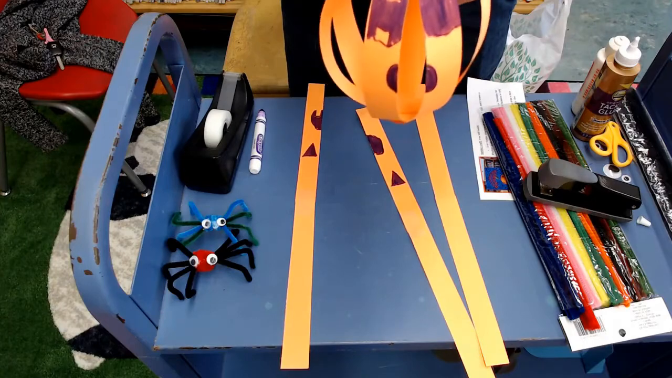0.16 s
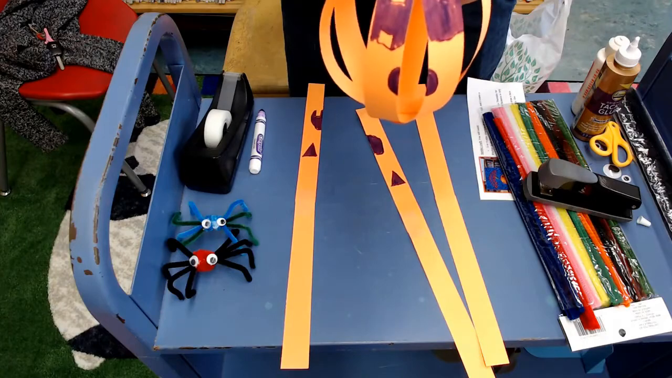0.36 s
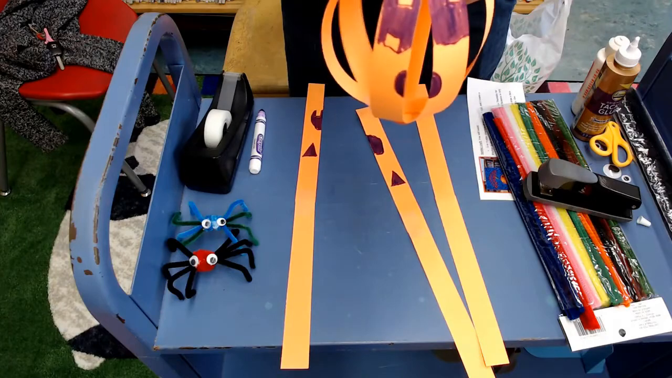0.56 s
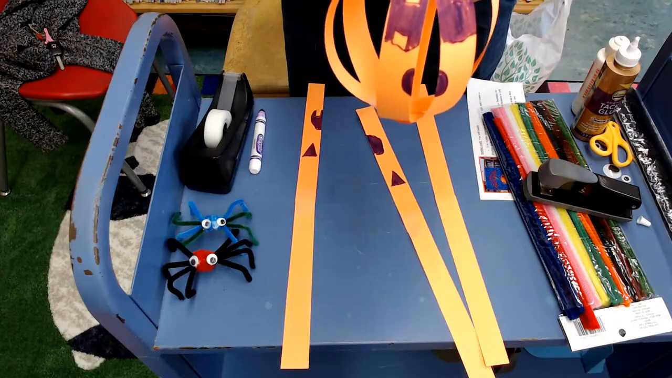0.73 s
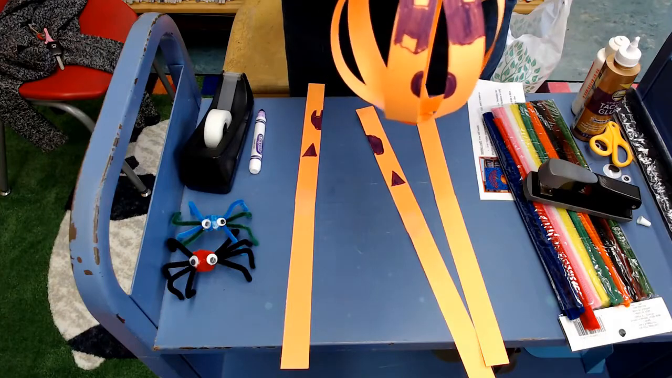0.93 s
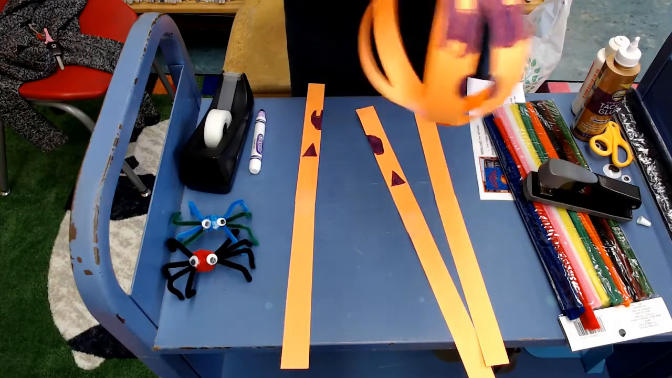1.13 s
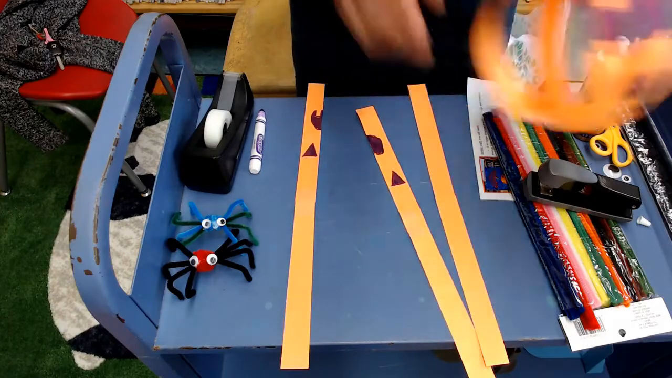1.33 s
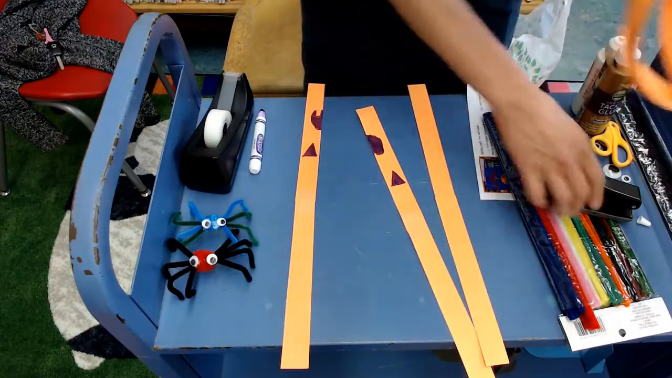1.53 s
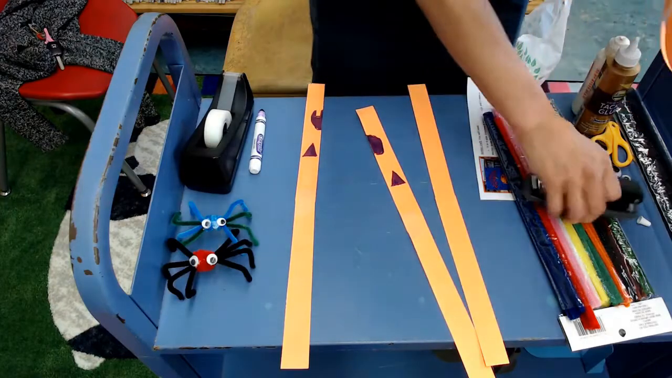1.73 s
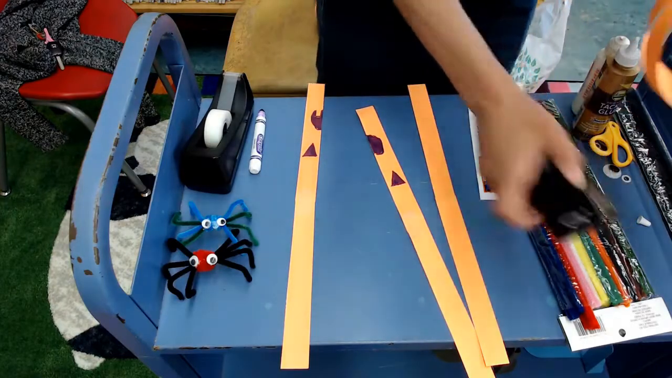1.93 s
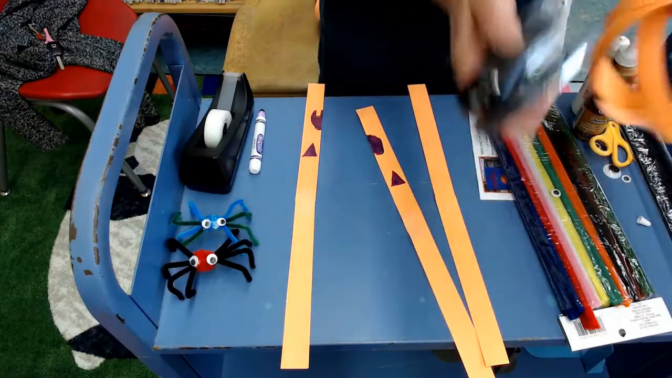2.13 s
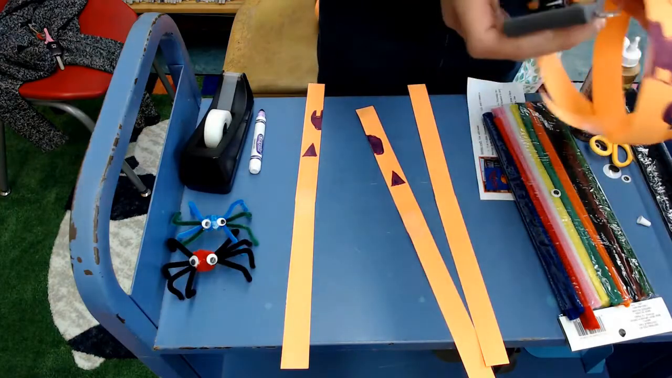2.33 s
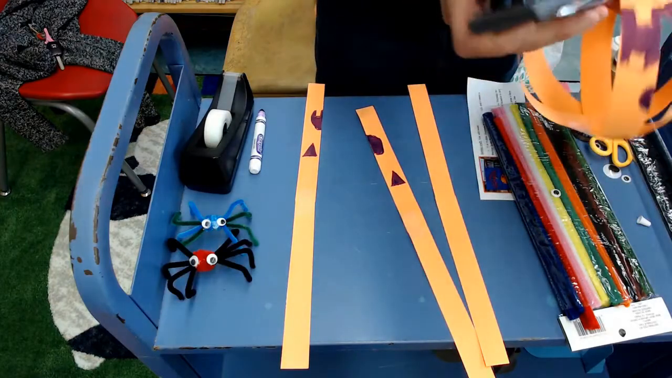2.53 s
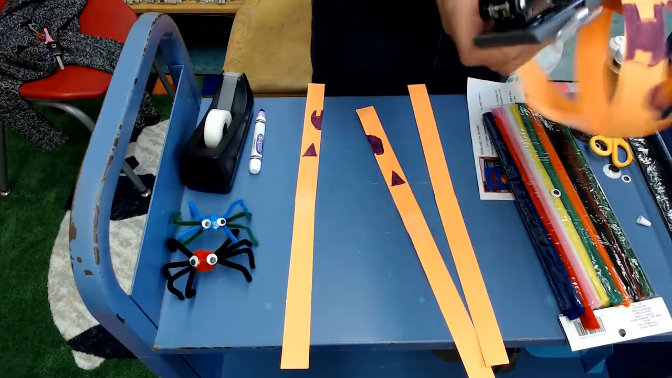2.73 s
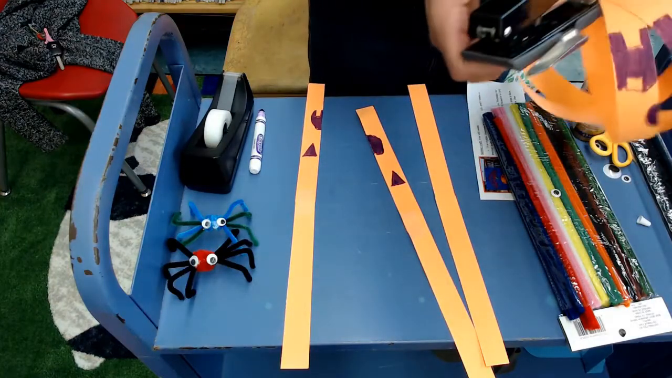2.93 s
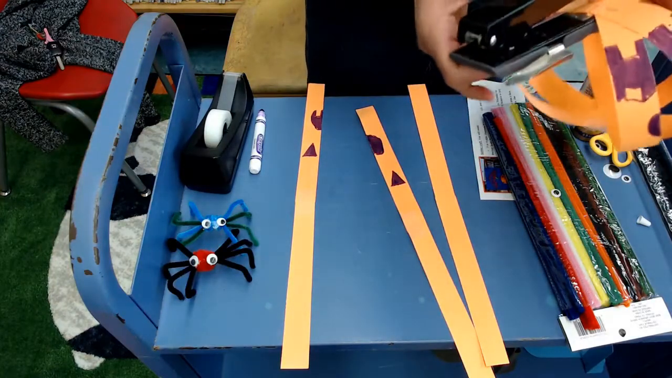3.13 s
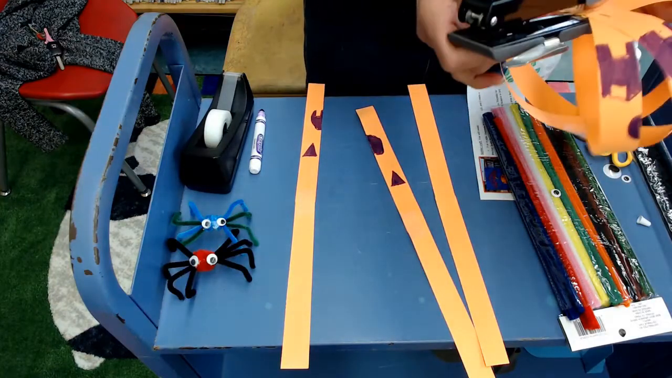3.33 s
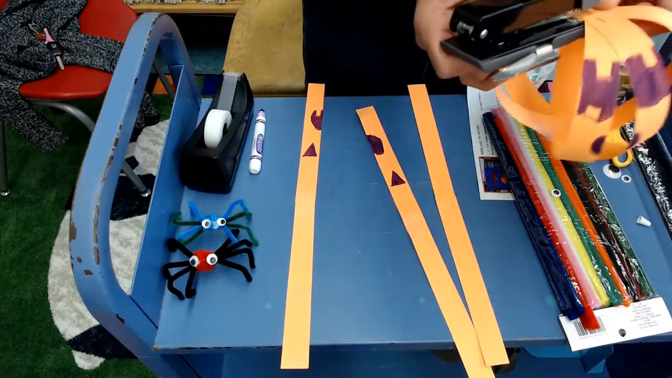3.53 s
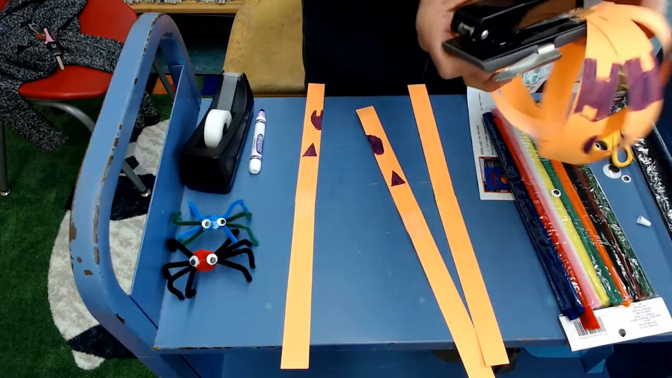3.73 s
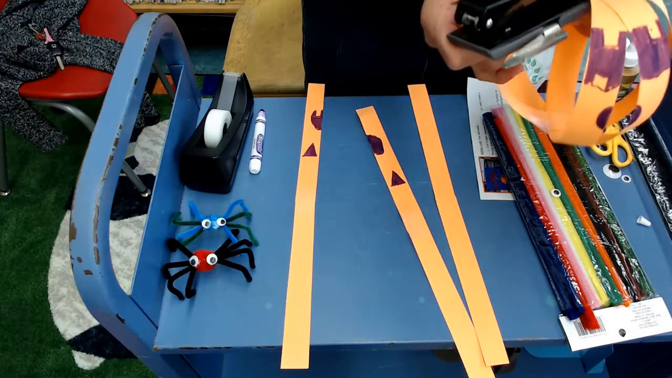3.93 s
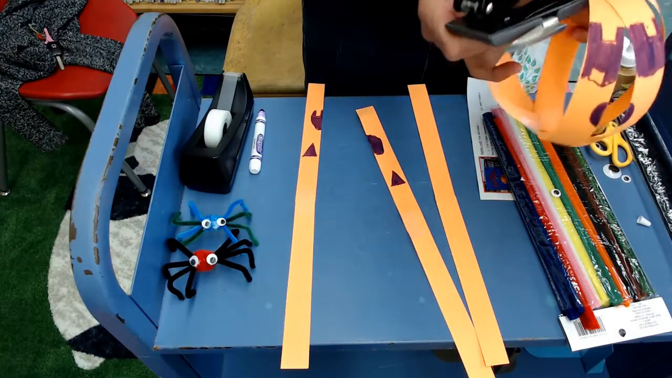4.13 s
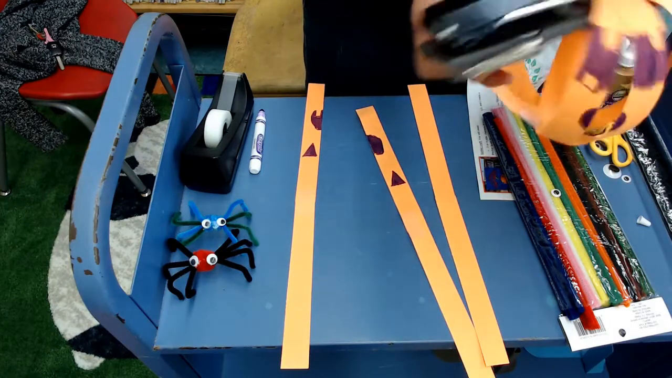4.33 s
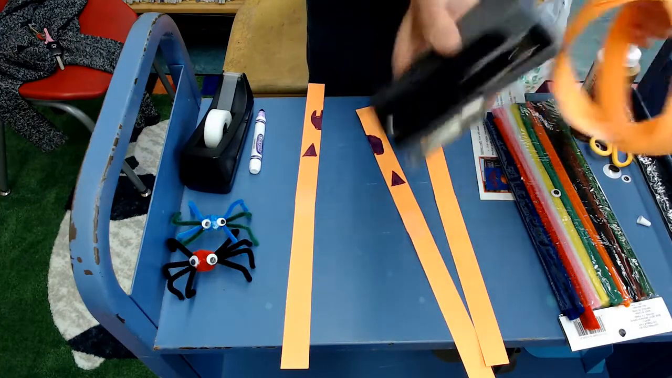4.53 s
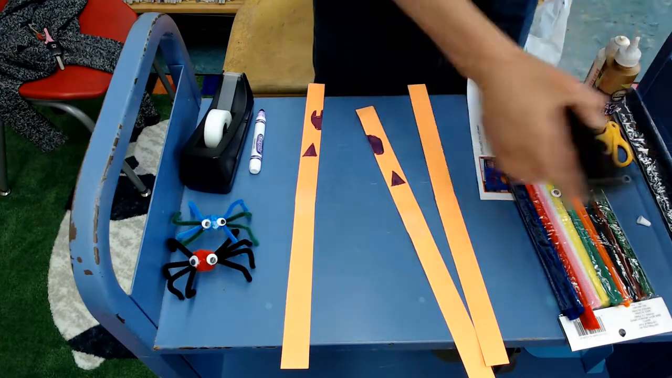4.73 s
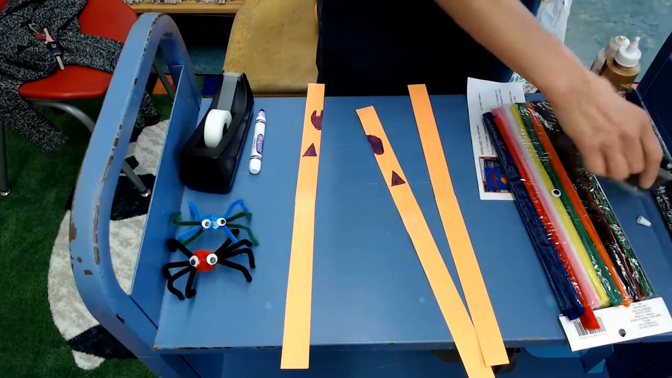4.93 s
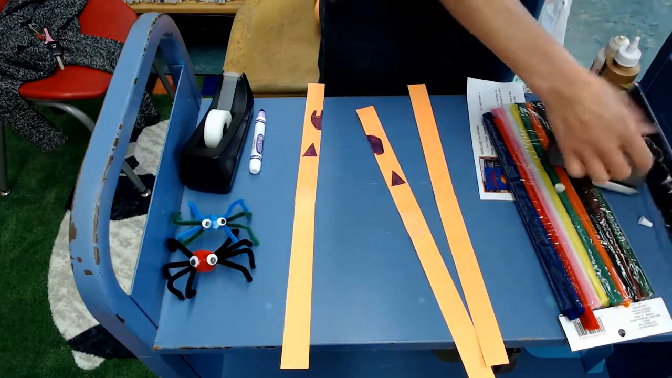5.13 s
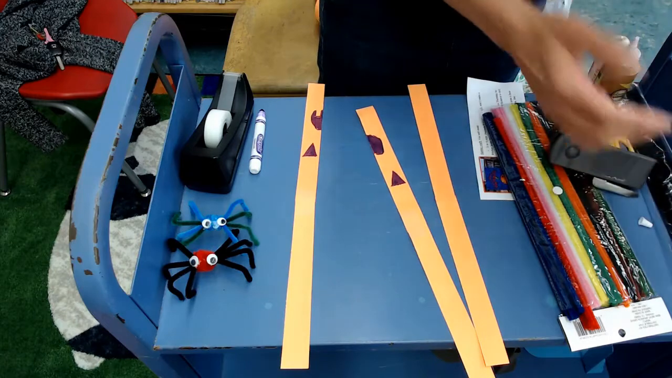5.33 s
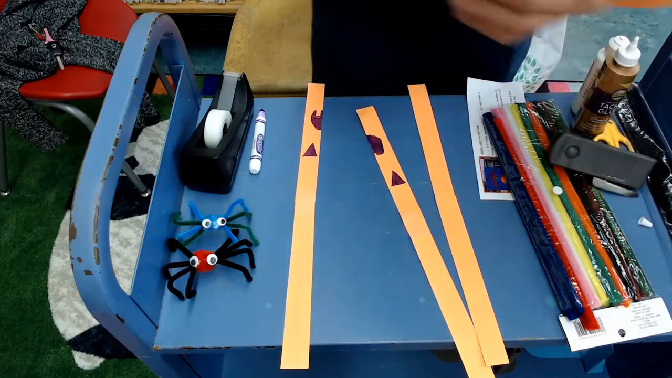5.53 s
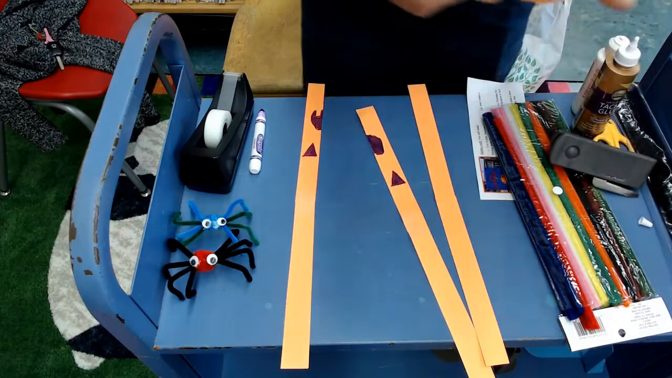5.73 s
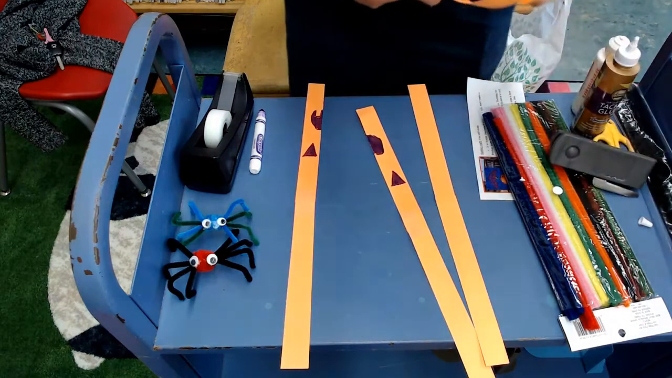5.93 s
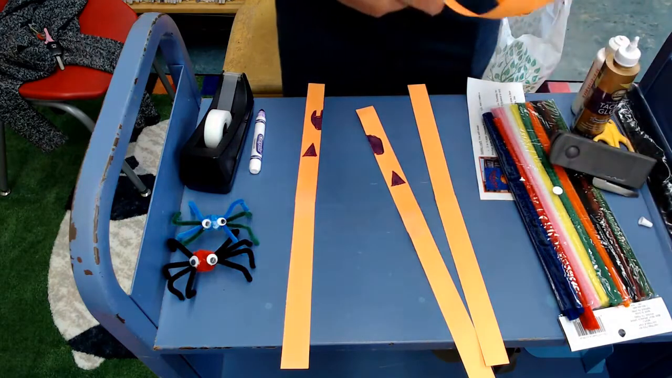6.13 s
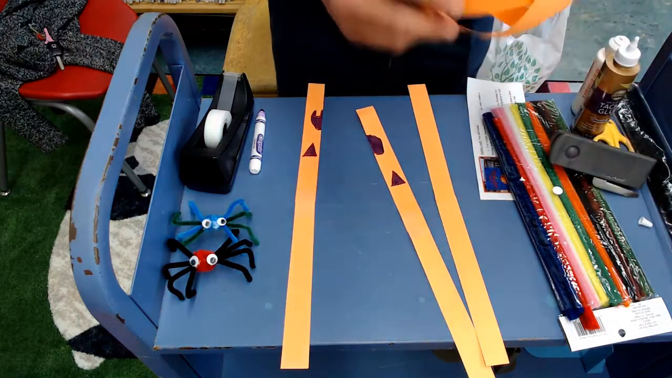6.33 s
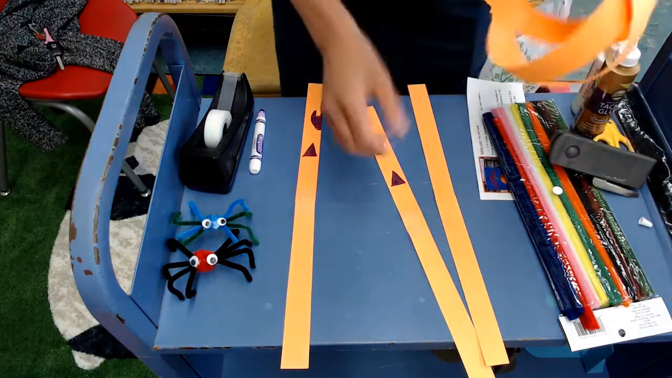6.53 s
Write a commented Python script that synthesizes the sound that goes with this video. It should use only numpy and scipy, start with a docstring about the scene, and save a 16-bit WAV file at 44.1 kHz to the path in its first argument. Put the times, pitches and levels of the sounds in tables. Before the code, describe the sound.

Faint paper crackles, two loud stapler clacks with a jangling spring, a sharp landing on a packet over sheet metal, then light rustling.

```python
"""Stapler and paper over a metal cart

Close up in a quiet room, paper slides in the hands: moving bands of noise, with short pops and crackles on top.
A desk stapler is picked up, snaps twice and springs open: noise bursts through arm resonances, a jangling tail.
It lands on a plastic packet on a sheet-metal cart: cracks, ringing modes, a dull thud, crunching and rattling.
Ventilation hums underneath: filtered noise and a wavering fan tone."""
import sys
import numpy as np
from scipy import signal
from scipy.fft import rfft, irfft, next_fast_len
from scipy.io import wavfile
from scipy.ndimage import uniform_filter1d, map_coordinates

SR = 44100
rng = np.random.default_rng(int(sys.argv[2]) if len(sys.argv) > 2 else 0)


def master_out(mix):
    """Clip the mix to full scale and print it as 16-bit PCM to the path in sys.argv[1]."""
    frames = np.transpose(np.atleast_2d(mix))
    ceiling = np.clip(frames, -1, 1)
    pcm = np.round(ceiling * 32767).astype(np.int16)
    wavfile.write(sys.argv[1], SR, pcm)


N = 294147  # length [samples]

# slow random drift of the low rumble and hum: (time [s], rumble level [dB], hum level [dB])
RUMBLE_HUM_DRIFT = [(0.0, -72.5, -71.5), (1.22, -69.5, -71.5), (4.07, -75.5, -71.5), (4.55, -67.5, -72),
                    (4.85, -73, -70), (5.0, -64, -73), (5.37, -66, -69), (5.93, -74, -68.5),
                    (6.35, -63, -70), (6.67, -66.5, -66.5)]
# colour of the low rumble: (frequency [Hz], relative level [dB])
RUMBLE_COLOUR = [(10, -29), (20, -7), (35, -0.5), (55, 1.5), (72, -6.5), (100, -15.5), (130, -30),
                 (200, -81)]
# duct resonances: (frequency [Hz], width [Hz], level [dB])
DUCT_MODES = [(82, 7.4, -2), (157.6, 12, -7), (203.5, 6.5, -7), (228, 24, -17), (430.4, 87, -24)]
# colour of the room tone: (frequency [Hz], relative level [dB])
ROOM_TONE_COLOUR = [(150, -23.5), (250, -2), (1180, -13), (6700, -24.5), (14700, -27), (16000, -26)]
# decay of the room's answer: (frequency [Hz], 60 dB decay [s])
ROOM_DECAY = [(300, 1), (2000, 0.16), (6000, 0.45), (14000, .3)]
FAN_HZ, ROOM_TONE_DB = 90.8, -81.5

# blows on the cart: (time [s], crack level [dB], crack 60 dB decay [s], boom level [dB], crack's ringing band [Hz])
LANDING_BLOWS = [(4.8366, -17.5, 0.031, -37, 7170), (4.862, -33.5, 0.019, -49.5, 4800),
                 (4.874, -37, .03, -59.5, 2300), (4.91, -38, 0.17, -49.5, 2050),
                 (4.9389, -25, 0.021, -53, 6150), (4.9464, -25, 0.029, -52.5, 6260),
                 (4.9626, -31.5, 0.085, -53, 2780), (4.9777, -32.5, 0.027, -68, 2730),
                 (5.002, -38.5, 0.03, -75, 5860), (5.0167, -39.5, 0.074, -61.5, 5160),
                 (5.048, -42.5, 0.047, -59.5, 5900), (5.056, -39.5, 0.037, -60.5, 2050),
                 (6.4847, -57, 0.053, -56, 2270), (6.544, -72, .04, -60.5, 1700)]
# modes of the sheet metal: (frequency [Hz], level [dB], 60 dB decay [s])
CART_MODES = [(121.3, -4.5, 0.64), (209.4, 2, 0.21), (250, -6, 1.6), (267.2, 7, 0.18), (363.4, -6, 0.23),
              (446, -4, 0.15), (618, -5.5, 0.53), (717, -3, 0.15), (894, -17.5, 0.44), (1065, -8, 0.23)]
# settling on the packet: (time [s], crunch level [dB], cart rattle level [dB])
SETTLING_LEVELS = [(4.84, -45, -44.5), (5.074, -56, -56.5), (5.2, -103, -77)]
# colour of a landing crack: (frequency [Hz], relative level [dB])
CRACK_COLOUR = [(470, -8), (800, -9), (2570, 4), (3650, -11), (4030, 6), (7360, -1), (16000, -15)]
# colour of the crunching packet: (frequency [Hz], relative level [dB])
PACKET_COLOUR = [(880, -6), (1500, -5), (2540, -8), (2830, -11), (4000, -24), (5170, -17.5), (16000, -37)]
# colour of the cart rattle: (frequency [Hz], relative level [dB])
RATTLE_COLOUR = [(59, -35), (100, -13.5), (323, -9.5), (609, -0.5), (744, -6), (4000, -16.5), (5200, -49.5),
                 (8800, -120)]
THUD_DB, THUD_HZ = 8.5, 169  # dull push, level against the boom

# strokes of paper through the fingers:
# (loudest time [s], rise [s], fall [s], level [dB], brightest band [Hz], body against the hiss [dB])
PAPER_STROKES = [(.01, 0.019, 0.03, -75.5, 4830, -3), (.13, 0.019, 0.071, -73.5, 4900, -2),
                 (.35, 0.0054, 0.03, -71, 4530, -7), (.636, 0.0054, 0.014, -65.5, 4860, 2),
                 (.81, 0.0099, 0.024, -73, 5100, 2.5), (.965, 0.076, 0.043, -71.5, 6240, -6),
                 (1.45, .02, .07, -86, 3600, 12), (1.62, 0.16, 0.4, -71.5, 3600, 7.5),
                 (1.885, 0.046, 0.017, -66.5, 4550, -2.5), (2.03, 0.024, 0.047, -75, 4700, 3.5),
                 (2.13, 0.061, 0.057, -69, 4560, 1), (2.37, 0.056, 0.05, -72.5, 6270, -1.5),
                 (2.488, 0.022, 0.043, -69, 3620, 5.5), (2.703, 0.14, 0.1, -63.5, 7600, -4.5),
                 (3.1, 0.074, 0.091, -77.5, 4770, 12), (3.23, 0.12, .08, -71.5, 4800, -0.5),
                 (3.33, 0.062, 0.05, -65, 7360, -6), (3.5, 0.18, 0.15, -65.5, 6560, -1.5),
                 (4.068, 0.098, 0.069, -56.5, 5850, 2.5), (4.169, 0.012, 0.054, -55.5, 5270, -8),
                 (4.26, 0.033, .04, -71, 4860, 2), (4.34, 0.041, 0.057, -64.5, 5430, -5.5),
                 (4.465, 0.047, 0.024, -60.5, 5130, -4.5), (4.58, 0.038, 0.034, -68.5, 5070, -4),
                 (4.711, 0.079, 0.083, -66.5, 5065, -3), (5.305, 0.017, 0.039, -61, 5190, -1.5),
                 (5.439, 0.078, 0.076, -63.5, 5243, -2.5), (5.691, 0.094, 0.12, -68, 6010, -12),
                 (5.9, 0.033, 0.025, -62.5, 5710, 2), (6.029, 0.086, 0.078, -63, 6290, -5.5),
                 (6.16, 0.081, 0.071, -64, 6010, 0.5), (6.351, 0.048, 0.055, -71, 5300, -3),
                 (6.44, 0.046, 0.032, -70, 5350, -5.5), (6.525, 0.025, 0.083, -64.5, 4370, 1),
                 (6.67, 0.063, 0.045, -63, 4500, -2)]
# short pops and crackles: paper, packet, stapler being picked up, onsets of swishes:
# (time [s], level [dB], centre [Hz], body against that level [dB])
PAPER_POPS = [(0.569, -65, 7450, -25), (0.778, -61.5, 3650, -26), (0.803, -63.5, 6200, -5),
              (0.954, -45.5, 6150, -16.5), (0.978, -56, 4650, -11), (1.25, -60, 4000, -30),
              (1.407, -60.5, 2560, 9.5), (1.415, -52.5, 3500, 10.5), (1.422, -51, 3440, 3),
              (1.431, -53.5, 2550, 6), (1.511, -56.5, 1750, -10), (1.537, -54.5, 2500, 3.5),
              (1.553, -47.5, 5500, -2), (1.568, -53.5, 5050, -1), (1.588, -57, 3870, 1),
              (1.606, -50, 3100, -2), (1.619, -48.5, 4560, -14), (1.6235, -54.5, 5090, 4.5),
              (1.644, -59, 2480, -6), (1.654, -56, 2500, -3), (1.6633, -49.5, 2920, -14),
              (1.676, -59, 4000, -3), (1.723, -53.5, 2520, -12), (1.727, -51, 3820, -3.5),
              (1.761, -55, 2530, -18), (1.774, -63, 3930, -10), (2.211, -63.5, 4400, -5),
              (2.244, -59, 4030, -4.5), (2.32, -69, 2500, 11), (2.617, -55, 3100, -9),
              (2.825, -68.5, 2440, 12), (3.057, -46.5, 5050, -1.5), (3.112, -43.5, 2730, -11),
              (3.387, -65, 2020, 8.5), (4.154, -50.5, 4750, -8), (4.319, -56.5, 5400, -24),
              (5.303, -55.5, 6010, -9), (5.334, -47.5, 5357, -39), (5.42, -42.5, 4550, -5),
              (5.905, -57.5, 4682, 0.5)]
# colour of the paper hiss: (frequency [Hz], relative level [dB])
HISS_COLOUR = [(1180, -40), (2000, -9.5), (2830, -2), (7510, -2.5), (10000, -8), (12200, -7),
               (15100, -12.5), (16000, -20)]
# level change at a stroke's two ends, squareness of its arch, depth of its wavering
EDGE_DB, SHOULDER, FLUTTER_DB = -11, 2.5, 2
HELD_DB = -89  # the strips whisper between strokes
TICK_T60_S, TICK_DB = 0.003, 0.5  # sharp front of a pop
# decay of a -53.5 dB pop, and how many dB longer it gets per dB of level
POP_T60_S, POP_T60_GROWS_DB = 0.02, 0.45

# stapler contacts: (time [s], level [dB], rise [s], 60 dB decay [s],
#                    best-driven band [Hz], width of that band [Hz], its lift [dB])
STAPLER_CONTACTS = [(3.6335, -10.5, 0.0011, 0.015, 4558, 1400, 15),
                    (3.647, -37.5, 0.0039, 0.14, 2300, 370, 7), (3.71, -8, 0.00099, 0.018, 1990, 1600, 6.5),
                    (3.722, -30.5, 0.0034, 0.068, 1880, 250, -1),
                    (3.73, -36, 0.0015, 0.019, 6530, 3000, -3),
                    (3.979, -43.5, 0.0025, 0.053, 4500, 5400, 12.5),
                    (3.991, -38, .003, 0.067, 3000, 1500, 7.5), (3.99, -45, .006, 0.029, 1330, 150, 16),
                    (3.999, -27, 0.0015, 0.024, 4570, 3000, 15.5), (4.003, -54, 0.0026, 0.01, 1530, 17, 37),
                    (4.0271, -41, 0.0016, 0.022, 3500, 2400, 8), (4.029, -41, .002, 0.013, 1664, 100, 23),
                    (4.029, -44.5, 0.0027, 0.044, 363, 82, 29)]
# stapler arm and magazine: (frequency [Hz], width [Hz], level [dB])
ARM_MODES = [(250, 580, -14), (656, 350, -6.5), (1140, 150, 3), (1570, 180, -3.5), (1720, 140, -3),
             (2320, 300, -4.5), (3200, 400, -4.5), (4520, 740, -3.5), (5300, 860, -4), (6670, 1100, -4),
             (8440, 730, -4), (10900, 770, -8.5), (14400, 2200, -12)]
# return spring: (frequency [Hz], width [Hz], level [dB], 60 dB decay [s])
SPRING_MODES = [(1600, 160, -4, .33), (1760, 170, -3, .4), (1920, 140, -1, .3), (2130, 170, -2, .24)]
# colour of the tail after a snap: (frequency [Hz], level [dB])
ECHO_COLOUR = [(400, -24), (1100, -15), (1450, -12.5), (1720, -5), (2050, -2.5), (2500, -12.5), (4300, -9),
               (7500, -17), (16000, -26)]
# tail drive: offset, dB of drive per dB of contact, and the band that drives it most
ECHO_DB, ECHO_GROWS, ECHO_HZ = 15, 1.4, 1900
SPRING_DB, JANGLE_DB = -46, 5.5  # level against the tail drive, unevenness of the rattle


def amp(db):
    """Decibels to a gain."""
    return 10 ** (np.asarray(db) / 20)


def unit(x):
    """Scale to rms 1."""
    return x / np.sqrt(np.mean(x ** 2) + 1e-20)


def along(points, hz):
    """Read (frequency, value) points on a log frequency axis."""
    f, v = np.transpose(points)
    return np.interp(np.log(hz + 1), np.log(f + 1), v)


def curves(rows):
    """One value per sample for each column after the time."""
    s, *cols = np.transpose(rows)
    return [np.interp(np.arange(N) / SR, s, c) for c in cols]


def wobble(rate):
    """A smooth random curve, rate knots a second."""
    knots = rng.standard_normal(int(N * rate / SR) + 4)
    return map_coordinates(knots, [np.arange(N) * rate / SR])


def filtered(x, response):
    """Shape x by a complex response of frequency."""
    m = next_fast_len(len(x) + 8192)
    spectrum = rfft(x, m) * response(np.fft.rfftfreq(m, 1 / SR))
    return irfft(spectrum, m)[:len(x)]


def peak(f, hz, width):
    """Response of one causal resonance."""
    return 1j * f * width / (hz * hz - f * f + 1j * f * width)


def body(modes):
    """Resonances side by side, with alternating polarity."""
    return lambda f: sum((-1) ** k * amp(db) * peak(f, hz, width)
                         for k, (hz, width, db) in enumerate(modes))


def grainy(spectrum, grain_db, rate):
    """Coloured noise of rms 1 whose level wanders, rate knots a second."""
    noise = rng.standard_normal(N) * amp(grain_db * wobble(rate))
    return unit(filtered(noise, lambda f: amp(along(spectrum, f))))


def burst(response, rise, t60):
    """A puff of noise around one firm push at its crest, through a response."""
    t = np.arange(SR // 4) / SR
    shape = amp(-60 * np.maximum(t - rise, 0) / t60) * np.minimum(t / rise, 1) ** 2
    push = 4.5 * signal.unit_impulse(len(t), round(rise * SR))
    x = filtered(rng.standard_normal(len(t)) * shape + push, response)
    # the loudest 64 samples get an rms of 0.5, so peaks come out near 1
    return 0.5 * x / np.sqrt(uniform_filter1d(x ** 2, size=64).max())


def add(out, s, x):
    """Mix x into out from time s."""
    start = round(s * SR)
    out[start:][:len(x)] += x[:N - start]


def air():
    """Drifting low rumble and duct resonances, both filtered noise, with a wavering fan tone and faint hiss."""
    rumble_db, hum_db = curves(RUMBLE_HUM_DRIFT)
    fan_gain = amp(-0.5 + 2.5 * wobble(9))
    fan = fan_gain * np.sin(2 * np.pi * FAN_HZ * np.arange(N) / SR + 1.1 * wobble(5.9))
    duct = unit(filtered(rng.standard_normal(N), lambda f: body(DUCT_MODES)(f) * peak(f, 100, 430)))
    rumble = amp(rumble_db) * grainy(RUMBLE_COLOUR, grain_db=-2.0, rate=6)
    hum = amp(hum_db) * (fan + amp(-1.0) * duct)
    return rumble + hum + amp(ROOM_TONE_DB) * grainy(ROOM_TONE_COLOUR, grain_db=1.97, rate=18)


def room(x):
    """The room answers with a diffuse noise tail in which each frequency dies at its own speed."""
    hz, t, z = signal.stft(rng.standard_normal(SR * 3 // 4), SR, nperseg=256)
    decay = amp(-60 * t / along(ROOM_DECAY, hz)[:, None])
    tail = signal.istft(z * decay, SR, nperseg=256)[1]
    delayed = np.pad(x, (300, 0))  # samples, about 7 ms
    return signal.fftconvolve(delayed, tail / np.linalg.norm(tail))[:N]


def ring(modes, blur):
    """Modes struck at new strengths swell and die; phase noise widens high and damped ones most."""
    t = np.arange(SR) / SR
    out = np.zeros(SR)
    for hz, db, t60 in modes:
        envelope = amp(db + rng.uniform(-4.8, 1.2) - 60 * t / t60)
        swell = 1 - np.exp(-t * hz)  # over about one cycle
        drift = blur * hz / t60 * np.cumsum(rng.standard_normal(SR))
        out += envelope * swell * np.sin(2 * np.pi * hz * t + drift)
    return out


def clatter(s0, s1, hz, cycles, count):
    """Loose parts tick together: short damped rings at scattered pitches and sizes, rms 1 over the span."""
    when, pitch, size = rng.random((count, 3)).T
    pitch = np.clip(hz * 2 ** (3.2 * (pitch - 0.5)), 100, 14000)[:, None]
    t = np.arange(SR // 25) / SR
    gain = amp(-5 * np.log(size + 0.06))[:, None]
    rings = gain * np.sin(2 * np.pi * pitch * t) * np.exp(-t * pitch / cycles)
    at = ((s0 + (s1 - s0) * when) * SR).astype(int)[:, None] + np.arange(len(t))
    x = np.bincount(at.ravel(), rings.ravel(), N)
    return x / np.sqrt(np.sum(x ** 2) / ((s1 - s0) * SR))


def cart():
    """Blows crack on the packet and ring the sheet metal; things crunch and clatter as the stapler settles."""
    out = np.zeros(N)
    for s, db, t60, boom_db, hz in LANDING_BLOWS:
        colour = lambda f: amp(along(CRACK_COLOUR, f)) * (0.37 + 1.76 * peak(f, hz, 150))
        add(out, s, amp(db) * burst(colour, 0.00017, t60))
        thud = amp(THUD_DB) * burst(lambda f: peak(f, THUD_HZ, THUD_HZ), 0.00086, 0.048)
        add(out, s, amp(boom_db) * ring(CART_MODES, blur=2e-5))
        add(out, s, amp(boom_db) * thud)
    crunch_db, rattle_db = curves(SETTLING_LEVELS)
    s0, s1 = SETTLING_LEVELS[0][0], SETTLING_LEVELS[-1][0]
    settling = np.interp(np.arange(N) / SR, [s0 - 0.003, s0, s1, s1 + 0.065], [0, 1, 1, 0])
    crunch = grainy(PACKET_COLOUR, grain_db=3, rate=130)
    crunch += amp(-4.5) * clatter(s0, s1, hz=3590, cycles=9, count=160)
    rattle = grainy(RATTLE_COLOUR, grain_db=1.0, rate=120)
    rattle += amp(-3.0) * clatter(s0, s1, hz=1082, cycles=3.4, count=70)
    return out + settling * (amp(crunch_db) * crunch + amp(rattle_db) * rattle)


def strokes():
    """Gain of the sliding: each stroke is an arch that rises and falls at its own pace."""
    t, power = np.arange(N) / SR, amp(HELD_DB) ** 2
    for s, rise, fall, db, *_ in PAPER_STROKES:
        away = np.maximum((s - t) / rise, (t - s) / fall)  # 0 at the crest, 1 at the ends
        power = power + amp(db + EDGE_DB * np.minimum(away, 4) ** SHOULDER) ** 2
    return np.sqrt(power) * amp(FLUTTER_DB * wobble(25))


def rubbing():
    """Fibres rub in patches around a moving bright band; the bent strip adds a duller body."""
    grains = rng.standard_normal(N) * amp(1.3 * wobble(400) ** 2)
    hz, t, z = signal.stft(grains, SR, nperseg=256)
    patches = uniform_filter1d(rng.standard_normal(z.shape), size=5, axis=0)  # blur across pitch
    patches = unit(uniform_filter1d(patches, size=8, axis=1))  # then across time
    s, _, _, _, bright_hz, body_db = np.transpose(PAPER_STROKES)
    bright, f = np.interp(t, s, bright_hz), hz[:, None]
    hiss = amp(along(HISS_COLOUR, f)) * (0.71 + abs(peak(f, bright, 0.19 * bright)))
    sheet = amp(np.interp(t, s, body_db)) * abs(peak(f, 1700, 1600)) ** 2
    return signal.istft(z * amp(2.5 * patches) * np.hypot(hiss, sheet), SR, nperseg=256)[1][:N]


def paper():
    """Strokes shape the rubbing; each pop has a sharp tick and a duller body."""
    rub = rubbing()
    out = strokes() * rub
    for s, db, hz, low_db in PAPER_POPS:
        t60 = POP_T60_S * amp(POP_T60_GROWS_DB * (db + 53.5))
        colour = lambda f: peak(f, hz, 1.2 * hz) * (0.45 + peak(f, hz, 0.2 * hz))
        pop = burst(colour, 0.001012, t60)
        tick = amp(TICK_DB) * burst(colour, 0.00031, TICK_T60_S)
        add(out, s, amp(db) * (pop + tick))
        add(out, s, amp(db + low_db) * burst(lambda f: peak(f, 1100, 1400), 0.001, 1.5 * t60))
    return out


def spring(kicks):
    """Kicked coils jangle: each mode rattles unevenly and dies at its own speed, the highest soonest."""
    out = np.zeros(N)
    for hz, width, db, t60 in SPRING_MODES:
        decay = amp(-60 * np.arange(SR) / SR / t60)
        dying = signal.fftconvolve(kicks, decay)[:N]
        rattle = rng.standard_normal(N) * amp(JANGLE_DB * wobble(70))
        coils = unit(filtered(rattle, lambda f: peak(f, hz, width) ** 2))
        out += amp(SPRING_DB + db) * dying * coils
    return out


def stapler():
    """Each contact drives the arm's modes, most near its own band, and kicks the spring; the room answers."""
    out, kicks = np.zeros(N), np.zeros(N)
    for s, db, rise, t60, hz, width, lift_db in STAPLER_CONTACTS:
        colour = lambda f: body(ARM_MODES)(f) * (1 + amp(lift_db) * peak(f, hz, width))
        add(out, s - rise / 2, amp(db) * burst(colour, rise, t60))
        # the tail grows faster than the blow, most near its favoured pitch
        add(kicks, s, [amp(ECHO_GROWS * db + ECHO_DB) * abs(peak(hz, ECHO_HZ, 1700))])
    echo = filtered(room(kicks), lambda f: amp(along(ECHO_COLOUR, f)))
    return out + spring(kicks) + echo


def scene():
    """Stapler, cart and paper with the room's answer, over the ventilation."""
    blows, strips = cart(), paper()
    wet = amp(-16) * room(blows) + amp(-20.5) * room(strips)
    return (stapler() + blows + strips + wet + air())[None]


def record(dry):
    """The microphone chain rolls off steeply from 15.8 kHz to silence at 16.6 kHz."""
    return filtered(dry[0], lambda f: np.clip((16600 - f) / 800, 0, 1) ** 2)[None]


dry = scene()
out = record(dry)
master_out(out)
```